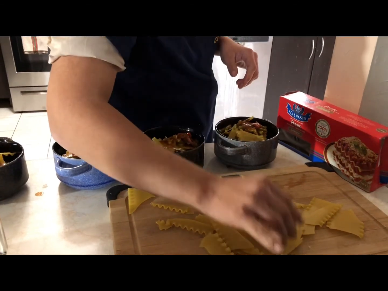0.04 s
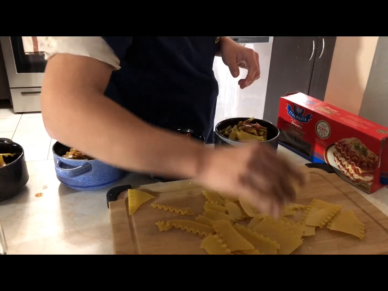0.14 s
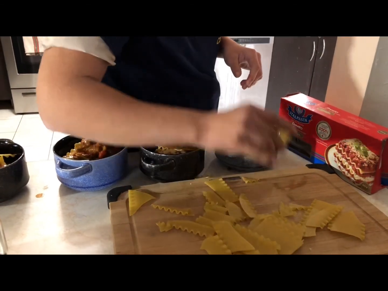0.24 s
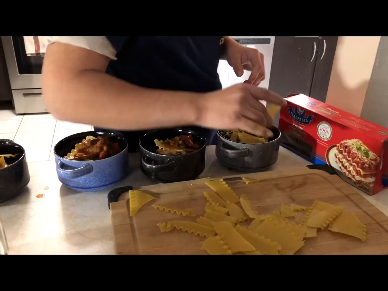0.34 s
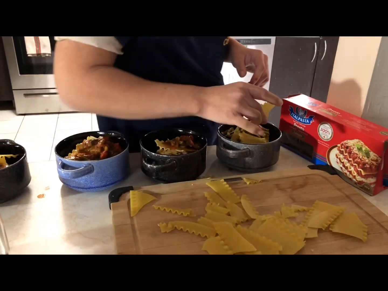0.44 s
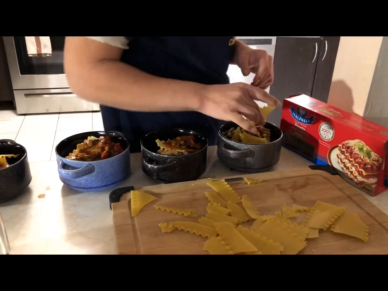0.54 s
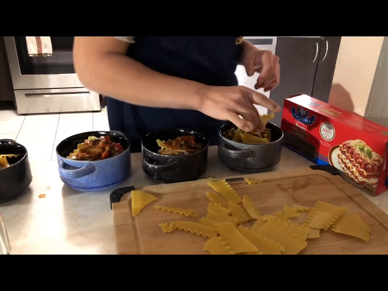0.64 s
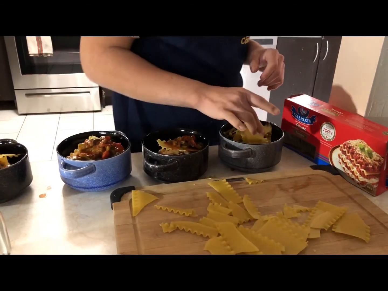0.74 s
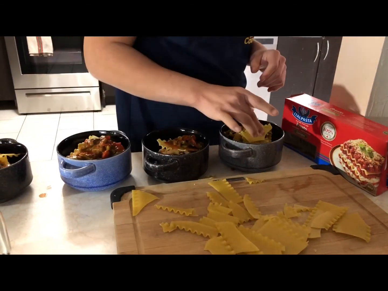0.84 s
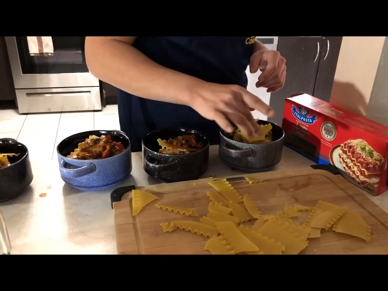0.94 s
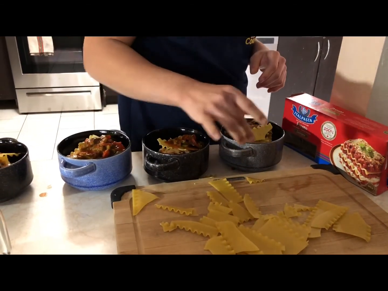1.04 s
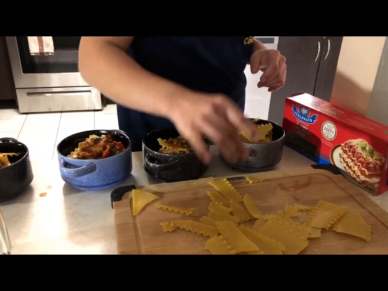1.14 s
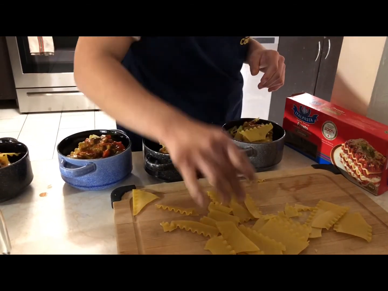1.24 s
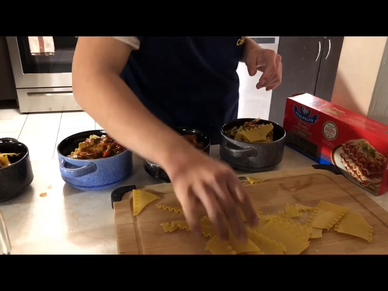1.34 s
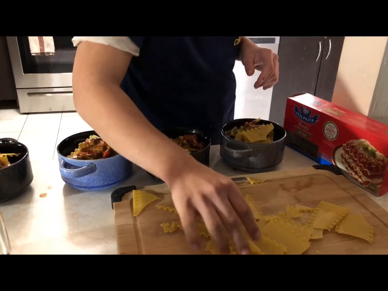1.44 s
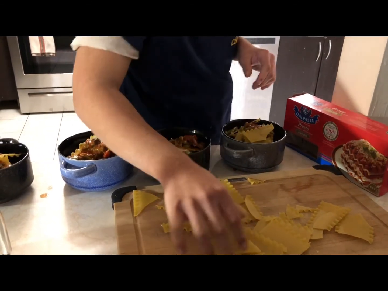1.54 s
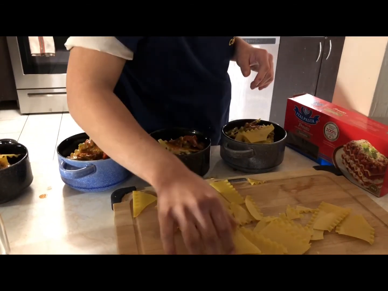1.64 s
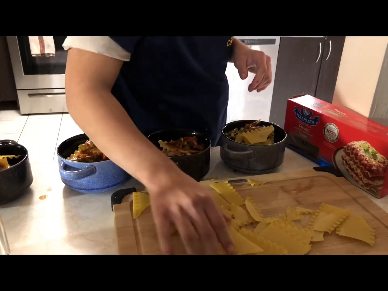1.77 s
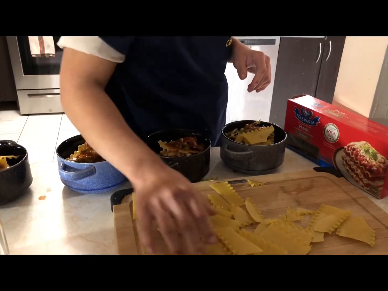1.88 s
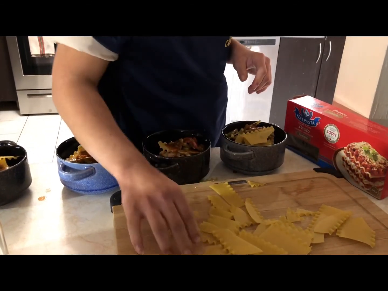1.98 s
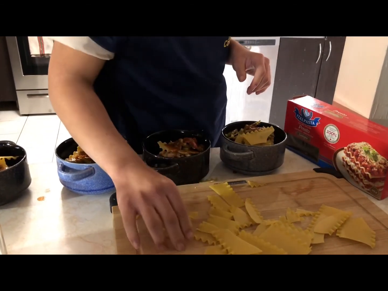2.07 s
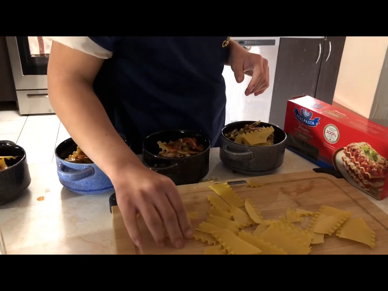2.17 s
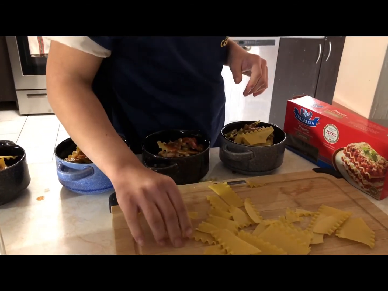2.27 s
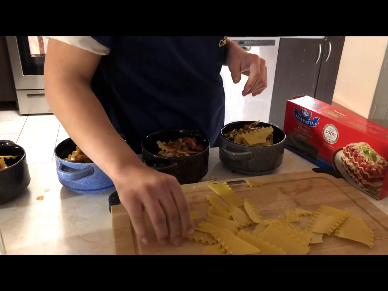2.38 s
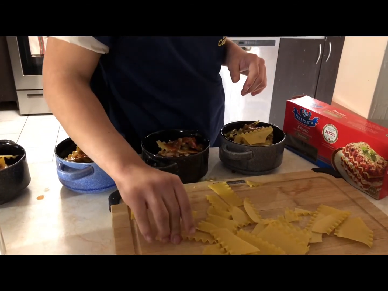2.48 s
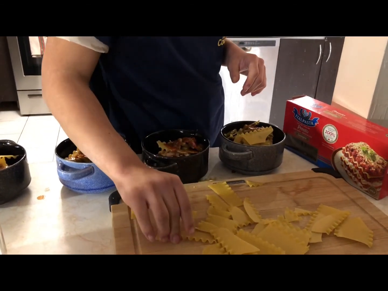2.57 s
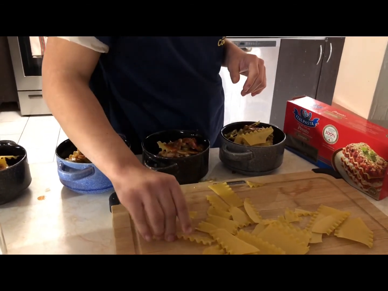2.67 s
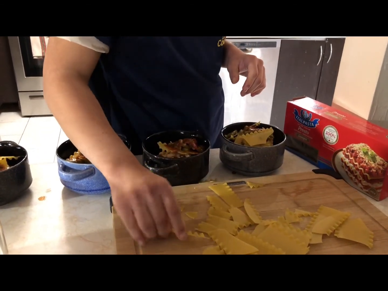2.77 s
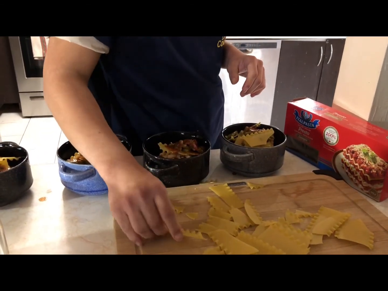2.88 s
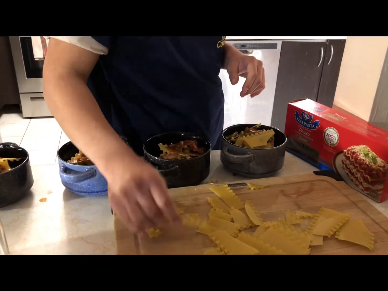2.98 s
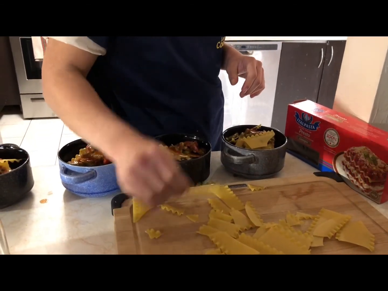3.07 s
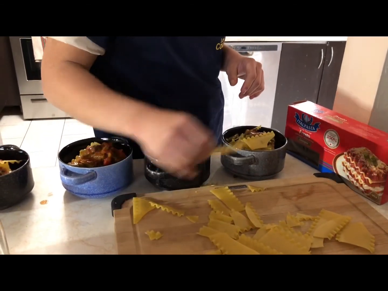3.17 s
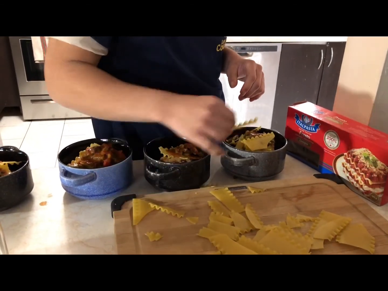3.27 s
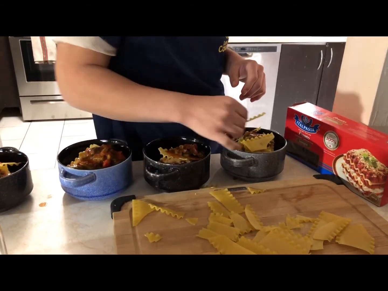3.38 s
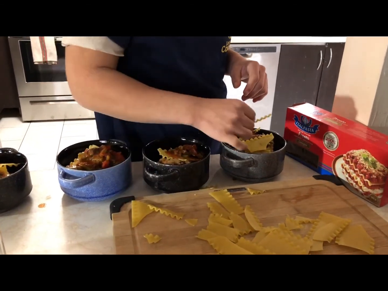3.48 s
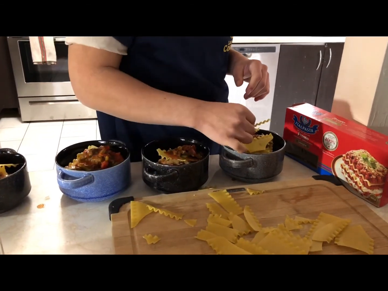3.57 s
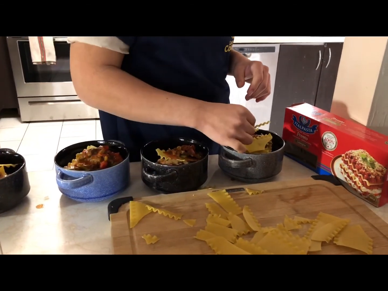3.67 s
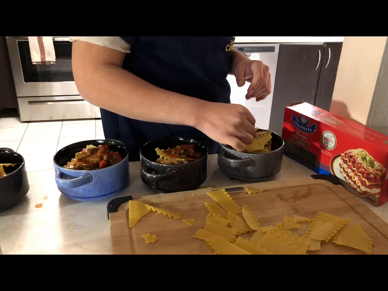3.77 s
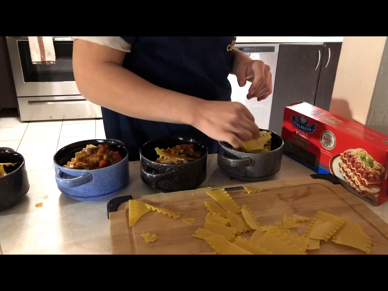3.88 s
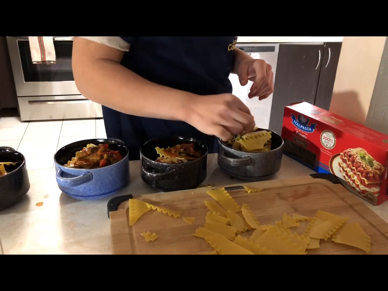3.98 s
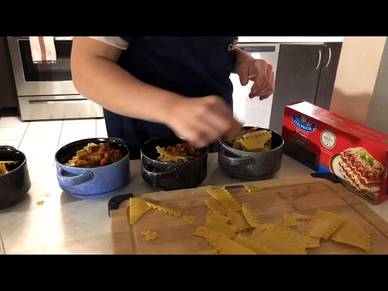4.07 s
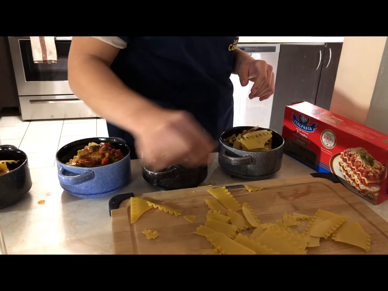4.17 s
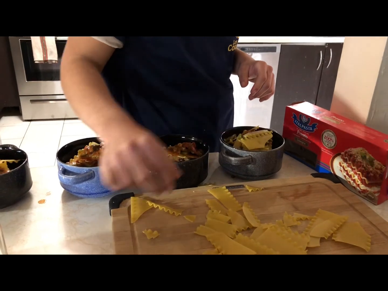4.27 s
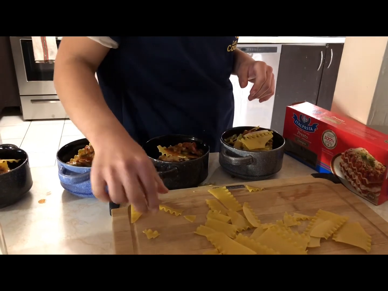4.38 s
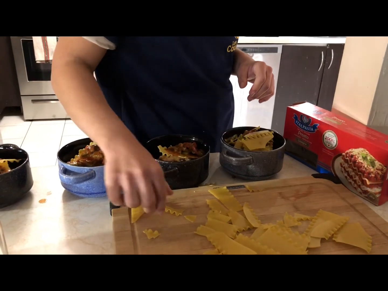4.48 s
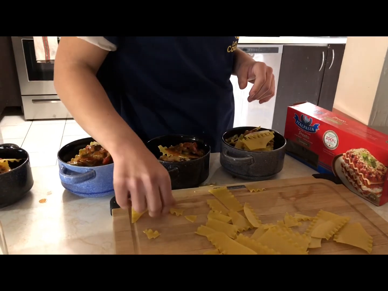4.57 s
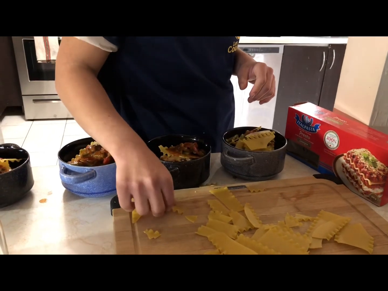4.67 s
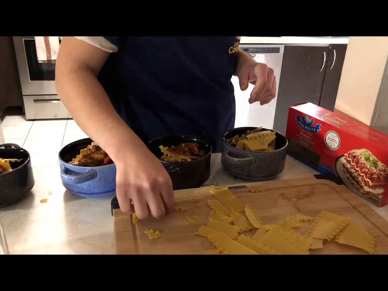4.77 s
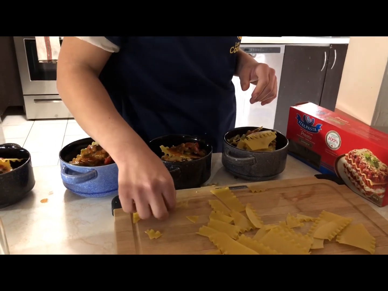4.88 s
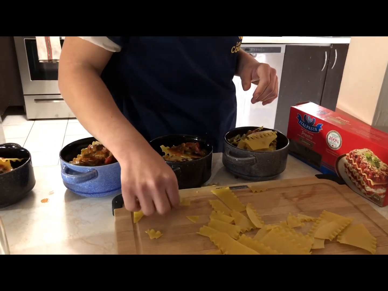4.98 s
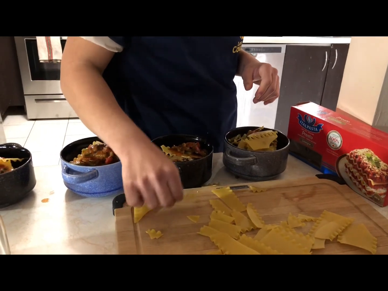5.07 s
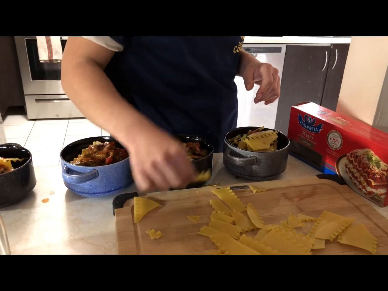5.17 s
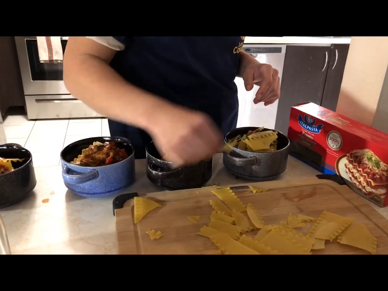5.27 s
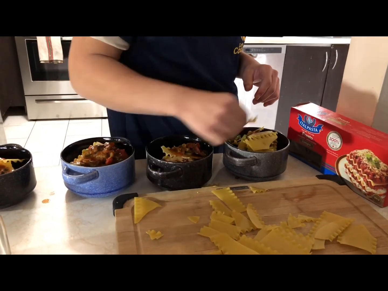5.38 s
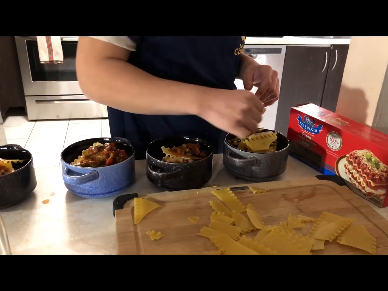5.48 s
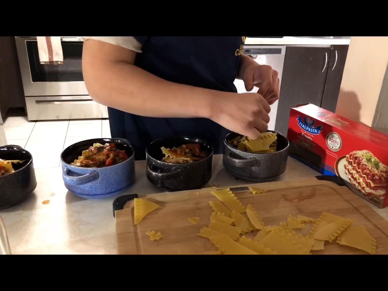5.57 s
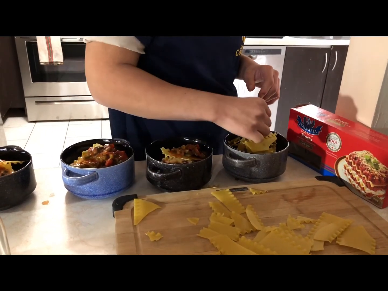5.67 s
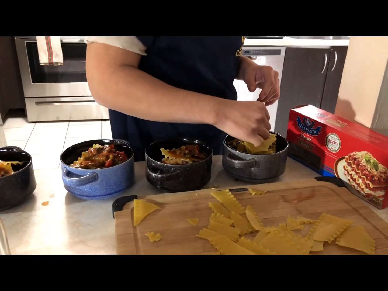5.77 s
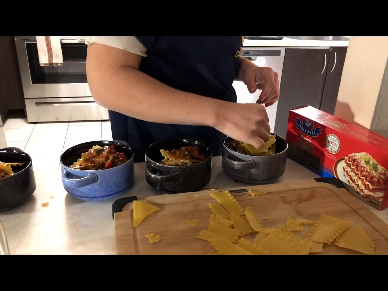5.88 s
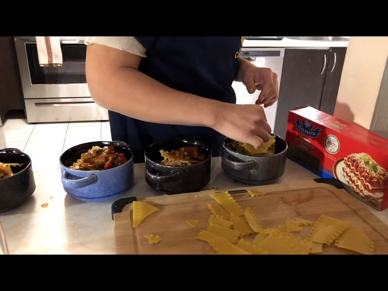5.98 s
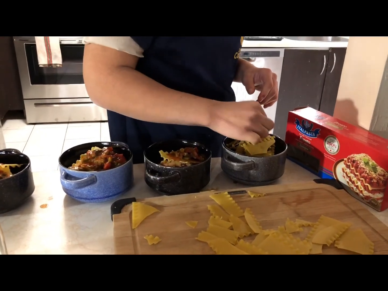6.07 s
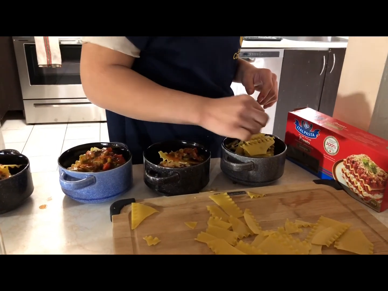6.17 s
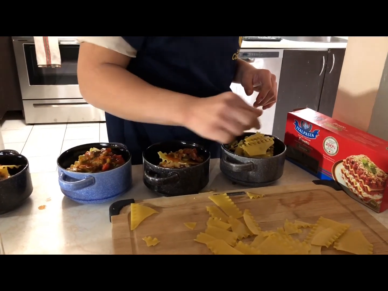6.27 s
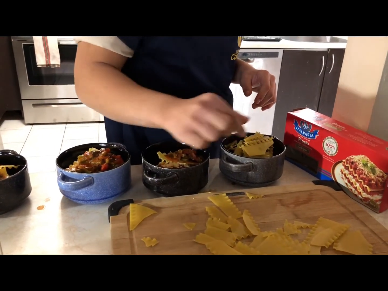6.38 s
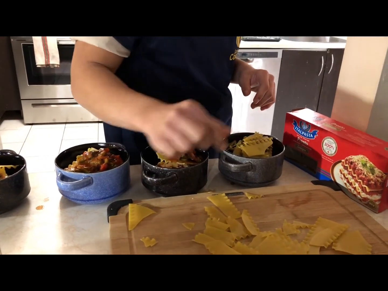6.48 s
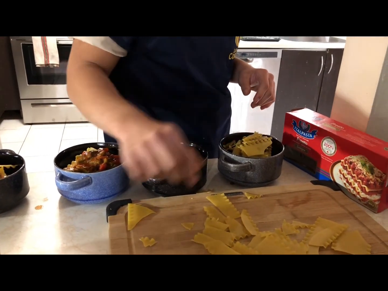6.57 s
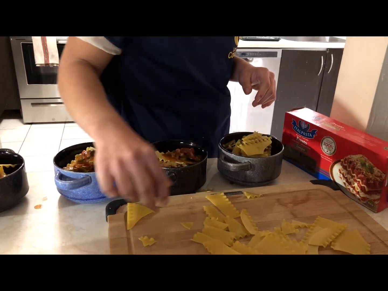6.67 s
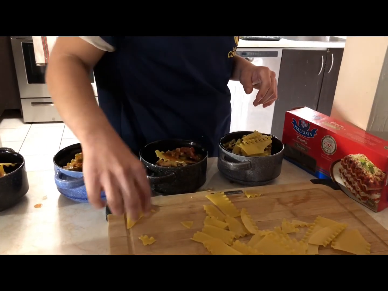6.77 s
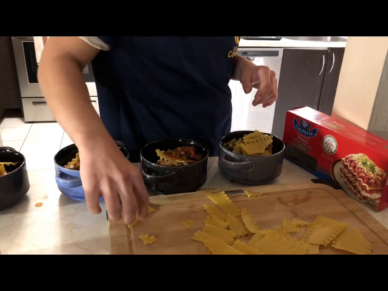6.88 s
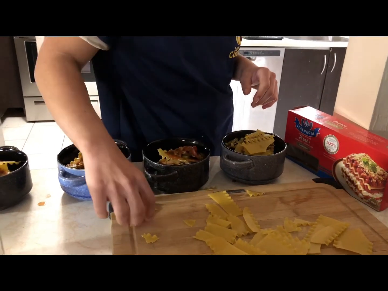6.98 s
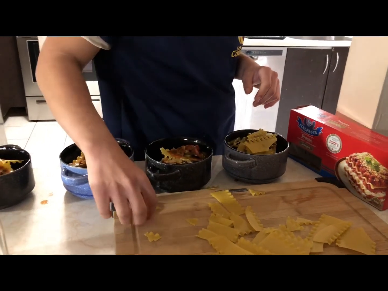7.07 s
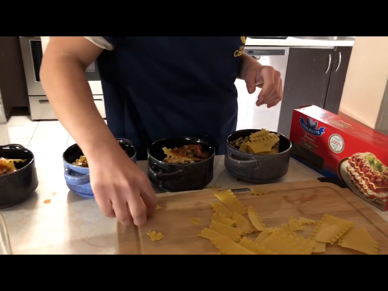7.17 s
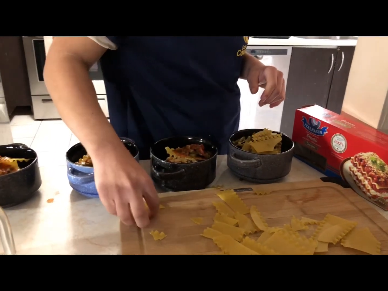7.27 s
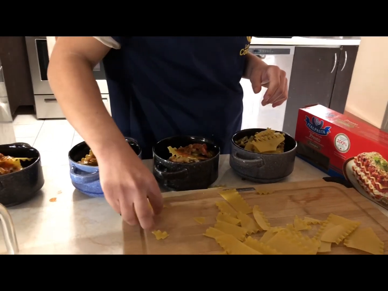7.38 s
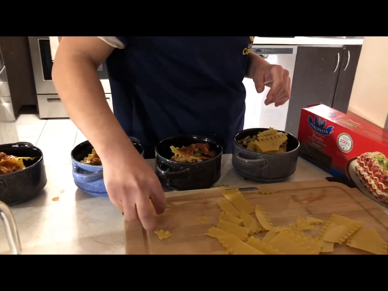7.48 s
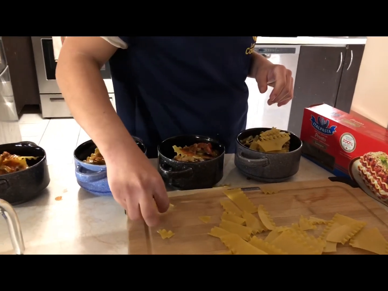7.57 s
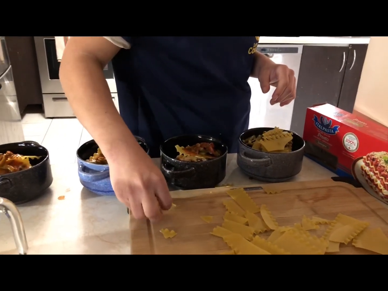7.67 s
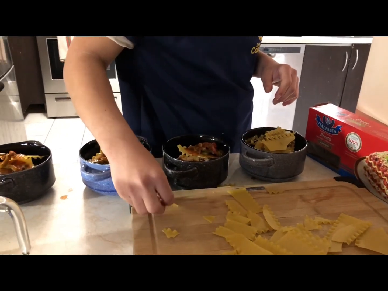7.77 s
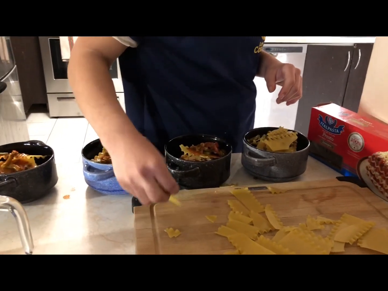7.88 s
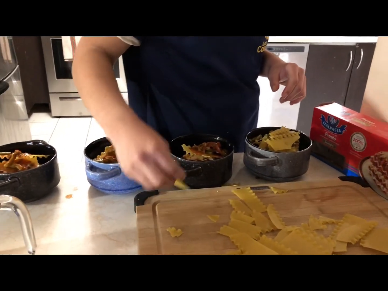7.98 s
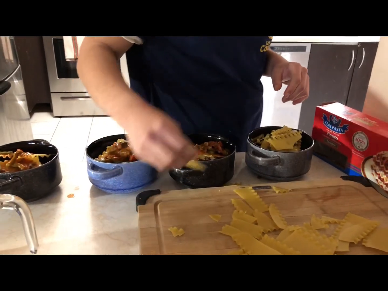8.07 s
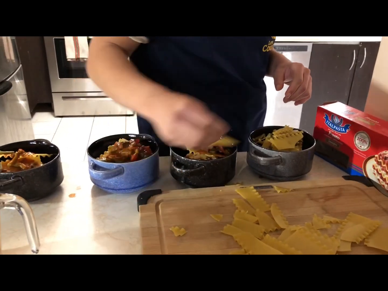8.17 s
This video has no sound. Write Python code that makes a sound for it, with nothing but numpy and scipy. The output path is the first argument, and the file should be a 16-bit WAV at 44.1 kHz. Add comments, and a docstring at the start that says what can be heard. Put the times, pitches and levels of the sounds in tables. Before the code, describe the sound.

A quiet, small kitchen with low steady rumble and faint hiss, the microphone close to a wooden board. At 0.76 s a stiff piece of dry pasta lands in a dish with a crisp clack, a tiny bounce and a brief ring. A soft fingertip thump at 1.5 s leads into rummaging from 1.65 to about 2.25 s: brittle clicks and gritty scrapes, loudest near 1.74 and 2.03 s, with the board resonating woodily. A piece is pulled free with a rasp at 2.55-2.9 s. A second bright clack lands at 3.78 s. At 4.53 s comes a low thump and a soft slide, then crisp ticks at 4.92 s. A faint thump at 5.15 s precedes a lighter, brighter clustered clack around 5.95 s. After a dull touch at 6.55 s, small thumps and ticks at 6.95-7.2 s give way to faint sliding and tiny scratchy clicks at 7.6-7.84 s, then room quiet.

```python
"""A small kitchen, phone held close to a wooden board where broken sheets of dry pasta are sorted.
Brittle pieces click and scrape: noise bursts and trains of tiny slips, coloured by bending modes and the board.
Fingers thump the board in low decaying notes, and three pieces set down in a dish ring briefly as beating modes.
The room adds a short tail of decaying noise over a low, nearly steady background."""
import sys
import numpy as np
from scipy import signal
from scipy.fft import rfft, irfft, next_fast_len
from scipy.io import wavfile
from scipy.ndimage import uniform_filter1d

SR = 44100
rng = np.random.default_rng(int(sys.argv[2]) if len(sys.argv) > 2 else 0)


def master(y):
    """Save y as 16-bit WAV."""
    cut = np.clip(np.atleast_2d(y).T, -1, 1)
    pcm = np.round(cut * 32767)  # scale
    wavfile.write(sys.argv[1], SR, pcm.astype(np.int16))


N = 363384
T = np.arange(N) / SR
TOP_HZ = 15900  # upper limit of the microphone
ATTACK_S = 0.005  # the level of a click or landing is the rms of this first span

# how a piece rubs during each move of the hand: (time [s], level ahead of the board [dB], crispness [dB])
# (at crispness 0 only the edge is heard, further below more of the dull face)
PUSH_INTO_HEAP = [(1.642,-50,-20), (1.668,-47,-11.5), (1.7,-42,-12), (1.73,-48,-15), (1.765,-40,-15),
                  (1.82,-51.5,-20)]
SORT_THROUGH_HEAP = [(1.9,-58.5,-15), (1.955,-48.5,-14.5), (2.0,-52,-14.5), (2.15,-51,-16.5), (2.2,-59,-14),
                     (2.4,-68,-12.5), (2.46,-55,-17.5), (2.51,-74,-14)]
PULL_FROM_HEAP = [(2.555,-62,-12), (2.575,-47.5,-12.5), (2.61,-43.5,-3.5), (2.68,-51.5,-17), (2.71,-40,-16),
                  (2.77,-59,-28), (2.89,-67,-30)]
SLIDE_TO_EDGE = [(4.53,-62,-20), (4.595,-64.5,-28), (4.62,-53,-7), (4.71,-52.5,-11), (4.79,-71,-14)]
LIFT_OFF_BOARD = [(4.815,-59,-10), (4.835,-51,-10), (4.865,-66,-11), (4.912,-54.5,-5), (4.928,-39.5,-2),
                  (4.96,-55,-9)]
GRIP_PIECE = [(6.95,-52,-4), (6.98,-54.5,-6), (7.02,-64,-9.5), (7.2,-63,-6), (7.25,-74,-10)]
SLIDE_FLAT = [(7.25,-71,-13), (7.35,-71.5,-14), (7.45,-79,-14), (7.57,-75,-11), (7.6,-54,-9),
              (7.65,-59.5,-7.5), (7.76,-54,-6)]
TIP_OVER_EDGE = [(7.76,-50,-7), (7.775,-53,-8), (7.792,-58,-5), (7.805,-50.5,-11), (7.828,-50.5,-9.5),
                 (7.84,-61,-5)]
# the moves: (curve, lowest mode of the piece [Hz], its ring [dB], low middle range [dB],
#             rumble relative to the rubbing ahead of the board [dB])
MOVES = [(PUSH_INTO_HEAP, 1600, -6, -1.1, -15), (SORT_THROUGH_HEAP, 1485, -9, 4.1, -5),
         (PULL_FROM_HEAP, 4200, 1, 1, -15), (SLIDE_TO_EDGE, 1880, -2.7, 0, -12.5),
         (LIFT_OFF_BOARD, 1370, 0, -1.7, -18), (GRIP_PIECE, 1800, -7, -1, -0.59),
         (SLIDE_FLAT, 1980, 3, -16, -22), (TIP_OVER_EDGE, 1305, 4.7, 0, -19)]
# spectrum of the dull rumble of the board on the counter: (frequency [Hz], relative density [dB per Hz])
RUMBLE = [(30, -23.5), (60, -6.5), (160, -1), (280, -3.5), (480, -15.5), (1500, -35.5), (6000, -57.5)]


def undb(db):
    """Decibels to gain."""
    return 10 ** (np.asarray(db) / 20)


def fade(t, t60):
    """Free decay, 60 dB in t60 seconds."""
    return np.exp(-np.log(1000) * t / max(t60, 1e-3))


def seconds(length):
    """Time axis of a short sound."""
    return T[:max(int(length * SR), 64)]


def unit(x, span=None):
    """Scale to rms 1, over the whole sound or over its first span seconds."""
    stop = int(span * SR) if span else None
    return x / np.sqrt(np.mean(x[:stop] ** 2) + 1e-18)


def add(track, s, x):
    """Mix x into the track at time s."""
    i = int(s * SR)
    track[i:i + len(x)] += x[:N - i]


def colour(x, points):
    """Causal minimum-phase filter through (Hz, dB) points."""
    size = 2 * next_fast_len(len(x) // 2 + SR // 20)
    hz, db = np.transpose(sorted(points))
    log_hz = np.log(np.fft.rfftfreq(size, 1 / SR) + 1)
    gain = undb(np.interp(log_hz, np.log(hz), db))
    # folding the cepstrum onto positive times makes the filter causal
    cepstrum = irfft(np.log(gain))[:size // 2]
    cepstrum[1:] *= 2
    response = np.exp(rfft(cepstrum, size))
    return irfft(rfft(x, size) * response)[:len(x)]


def resonance(x, hz, t60):
    """One damped mode, gain 1 at its centre; the shorter its decay, the wider its band."""
    width = np.log(1000) / (np.pi * max(t60, 1e-3))
    return signal.lfilter(*signal.iirpeak(hz, hz / width, fs=SR), x)


def background():
    """Low room rumble and a faint hiss: coloured noise whose level wavers slightly."""
    # spectrum: (frequency [Hz], relative density [dB per Hz])
    room_spectrum = [(20, -29), (32, -12.5), (60, -2.5), (80, -1), (150, -5.5), (240, -4), (360, -5.5),
                     (450, -8), (620, -13.5), (1370, -17), (2700, -21), (9800, -26), (15000, -31.5)]
    level_db = -65
    knots = np.linspace(0, T[-1], num=30)
    waver_db = 0.5 * np.interp(T, knots, rng.standard_normal(len(knots)))
    noise = unit(colour(rng.standard_normal(N), room_spectrum))
    return undb(level_db + waver_db) * noise


def kitchen(x):
    """Counter and cupboards send back early reflections, then a diffuse tail that dies soonest at the top."""
    # reverberation: (band centre [Hz], t60 [s], relative level [dB])
    reverb_bands = [(150, 0.61, 1), (592, 0.47, 7.5), (1500, 0.41, 1.5), (4000, 0.46, -2.5),
                    (6500, 0.48, -2.5), (9900, 0.31, -5.5), (15000, 0.148, 2.5)]
    t = seconds(0.6)
    hz, t60, db = np.transpose(reverb_bands)
    noise = rfft(rng.standard_normal(len(t)))
    log_hz = np.log(np.fft.rfftfreq(len(t), 1 / SR) + 1)
    tail = np.zeros(len(t))
    for k, band in enumerate(np.eye(len(hz))):
        # overlapping triangular bands on a log frequency scale
        band_noise = irfft(noise * np.interp(log_hz, np.log(hz), band), len(t))
        tail += undb(db[k]) * fade(t, t60[k]) * band_noise
    reflections = (rng.random(len(t)) < 900 / SR) * rng.standard_normal(len(t))  # 900 per second
    early = reflections * fade(t, 0.117)
    onset = np.clip((t - 0.003) / 0.0084, 0, 1)  # silent for 3 ms, then rising
    response = (unit(tail) + 1.3 * unit(early)) * onset
    return signal.fftconvolve(x, response / np.sqrt(len(t)))[:N]


def stroke(curve, edge_s=0.008):
    """Start time, gain and crispness in dB of one move, sample by sample; it sets in and stops quickly."""
    s, db, crispness_db = np.transpose(curve)
    t = seconds(s[-1] - s[0])
    edges = np.clip(np.minimum(t, t[-1] - t) / edge_s, 0, 1)
    gain = edges * undb(np.interp(s[0] + t, s, db))
    return s[0], gain, np.interp(s[0] + t, s, crispness_db)


def rumbles():
    """The moving hand also shakes the board: low noise in step with the rubbing."""
    out = np.zeros(N)
    rumble = unit(colour(rng.standard_normal(N), RUMBLE))
    for curve, *_, rumble_db in MOVES:
        start, gain, _ = stroke(curve)
        add(out, start, undb(rumble_db) * gain * rumble[int(start * SR):][:len(gain)])
    return out


def thumps(rumble_db=-3):
    """Soft fingertips push the board against the counter: a low note with a dull rumble."""
    # fingers meeting the board: (time [s], level over the first 16 ms [dB], pitch [Hz], t60 [s])
    finger_hits = [(1.472, -45, 268, 0.04), (1.473, -48.5, 135, 0.033), (1.651, -47, 150, .2),
                   (1.954, -52, 174, 0.097), (1.975, -57, 66, .3), (4.537, -45.5, 193.7, 0.23),
                   (4.548, -47.5, 65, 0.15), (5.154, -60.5, 154, 0.066), (6.552, -58, 172, .041),
                   (6.974, -59, 198, 0.15), (6.989, -55.5, 70, .2)]
    out, t = np.zeros(N), seconds(0.363)
    for s, db, hz, t60 in finger_hits:
        note = np.sin(2 * np.pi * hz * t)
        rumble = unit(colour(rng.standard_normal(len(t)), RUMBLE))
        push = fade(t, t60) * (1 - np.exp(-t / 0.0028))
        add(out, s, undb(db) * unit(push * (note + undb(rumble_db) * rumble), 0.016))
    return out


def pasta(x, low_db, high_db):
    """Thin, stiff sheets radiate little bass; a harder contact gives more treble."""
    # a very soft contact lasts so long that it loses the upper middle range too
    soft_db = min(high_db + 24.5, 0) * 0.3
    return colour(x, [(60, low_db - 23.5), (450, low_db - 6), (900, low_db - 0.5), (1600, low_db),
                      (3000, 0.0085), (4500, soft_db), (6200, 0.28 * high_db + soft_db),
                      (8500, high_db + 3.0), (12500, high_db), (16000, high_db - 7)])


def chatter(t, t60):
    """A hard edge touches down, then rattles in dying noise that stands for a run of tiny contacts."""
    return rng.standard_normal(len(t)) * fade(t, t60) * (1 - np.exp(-t / 0.00031))


def split_mode(t, hz, split=0.012, twin_db=-5):
    """The ragged outline of a broken sheet splits each mode into a close, beating pair."""
    start, twin_start, detune = rng.random(3)
    twin_hz = hz * (1 + split * (0.5 + detune))
    main = np.sin(2 * np.pi * (hz * t + start))
    twin = np.sin(2 * np.pi * (twin_hz * t + twin_start))
    return main + undb(twin_db) * twin


def drops(ring_db=-8):
    """A piece lands on its edge in the dish and bounces once; each crack sets its bending modes ringing."""
    # pieces landing in the dish: (time [s], level [dB], treble [dB], piece number)
    dish_landings = [(0.7596, -28.5, -6.5, 0), (3.7584, -60, -18, 1), (3.7794, -28.5, -6, 1),
                     (5.909, -52.5, -14, 2), (5.9514, -36, -2, 2), (5.974, -40.5, -1.5, 2)]
    # a sharp touch and one weaker, duller bounce:
    # (delay [s], relative level [dB], low range [dB], added treble [dB], chatter t60 [s])
    touches = [(0, 0, -13, -0.5, 0.023), (.006, -9, -5, -5, 0.035)]
    # bending modes in the dish: (piece number, frequency [Hz], level ahead of ring_db [dB], t60 [s])
    piece_modes = [ (0, 1546, 1, 0.2), (0, 2186, -10.5, 0.13), (0, 3390, -5, 0.1), (0, 3510, 9.5, 0.023),
                   (0, 4360, 10.5, 0.056), (0, 4560, 4, 0.035), (0, 5020, -1, 0.04), (0, 6500, -6, 0.11),
                   (0, 7700, 9.5, 0.017), (1, 1562, 0, .12), (1, 3074, -9, 0.092), (1, 3650, 0, .02),
                   (1, 4170, 4, .022), (1, 4780, 3, .025), (1, 5730, 7, .018), (1, 6030, 5, .015),
                   (1, 7900, 0, .015), (2, 1640, -0.5, 0.051), (2, 2360, -13, .09), (2, 4720, 4, 0.027),
                   (2, 5790, 11.5, 0.035), (2, 6030, 9, 0.011), (2, 8800, -19, 0.09),
                   (2, 10470, -10, 0.025)]
    out, t = np.zeros(N), seconds(0.3)
    for s, db, high_db, piece in dish_landings:
        for delay, touch_db, low_db, touch_high_db, t60 in touches:
            crack = unit(pasta(chatter(t, t60), low_db, high_db + touch_high_db), ATTACK_S)
            ring = sum(undb(mode_db) * fade(t, mode_t60) * split_mode(t, hz)
                       for owner, hz, mode_db, mode_t60 in piece_modes if round(owner) == round(piece))
            onset = 1 - np.exp(-t / 0.000067)
            landing = unit(crack + undb(ring_db) * ring * onset, ATTACK_S)
            add(out, s + delay, undb(db + touch_db) * landing)
    return out


def strip(x, hz, ring_db, cycles=24):
    """A piece in the heap or the fingers bends like a free bar; each mode falls 60 dB in some 24 cycles."""
    # bending modes of a flat strip: (multiple of the lowest mode, level ahead of ring_db [dB])
    bar_modes = [(1, 3.5), (2.76, 3.5), (5.4, -0.5), (9.3, -8)]
    modes = [(hz * ratio, db) for ratio, db in bar_modes if hz * ratio < TOP_HZ]
    return x + sum(undb(ring_db + db) * resonance(x, mode_hz, cycles / mode_hz) for mode_hz, db in modes)


def slides(grains_per_s=1500, spread_db=1.5, hiss=0.9, dull_db=-28, crisp_db=0):
    """Rough edges catch and slip: dense uneven ticks over a fine hiss excite the dragged piece."""
    out = np.zeros(N)
    slips = (rng.random(N) < grains_per_s / SR) * rng.standard_normal(N)
    wander = unit(uniform_filter1d(rng.standard_normal(N), size=180))
    grip = undb(spread_db * np.clip(wander, -2, 2))
    # two rows, for the face and the edge: the same slips, separate hiss
    friction = grip * (unit(slips) + hiss * rng.standard_normal((2, N)))
    # the broad rasp of a ragged edge on wood, at 5800 Hz
    friction = friction + resonance(friction, 5800, 0.0011)
    for curve, hz, ring_db, low_db, _ in MOVES:
        start, gain, high_db = stroke(curve)
        face_rub, edge_rub = friction[:, int(start * SR):][:, :len(gain)]
        face = unit(strip(pasta(face_rub, low_db, dull_db), hz, ring_db))
        edge = unit(strip(pasta(edge_rub, low_db, crisp_db), hz, ring_db))
        crispness = np.minimum(undb(high_db - crisp_db), 1) ** 0.76
        add(out, start, gain * unit((1 - crispness) * face + crispness * edge))
    return out


def clicks(ring_db=0):
    """Each knock on the board or another piece rattles one piece and takes on its colour."""
    # (time [s], level ahead of the board [dB], treble [dB], lowest mode of the piece [Hz], chatter t60 [s])
    knocks = [(1.4703,-50.5,-56,2260,0.11), (1.6488,-37,-18,3530,0.027), (1.6732,-35,-10,2400,0.027),
              (1.6879,-33.5,-13,2380,0.059), (1.7367,-22,-8,2380,0.049), (1.7488,-37,-1,930,0.03),
              (1.7621,-32.5,-4.5,3580,.04), (1.9505,-32.5,-22,1500,.014), (1.9967,-37.5,-18,2520,0.044),
              (2.0342,-18.5,-12,2150,.018), (2.0946,-31,-6.5,2370,.019), (2.1352,-32,-1.5,3430,.011),
              (2.2175,-45.5,0,1420,.02), (2.5743,-40.5,-36,2090,0.0097), (2.6944,-32,-7,1800,0.012),
              (4.5252,-51.5,-18,1700,.032), (4.5857,-51,-36,1920,0.076), (4.6096,-45.5,-26,1910,0.021),
              (4.6186,-46,-32,1360,0.029), (4.9201,-34.5,-6,1330,0.047), (4.9318,-37.5,-11,4760,.038),
              (6.9571,-48,-38,1300,0.037), (7.1138,-43,6.5,2670,0.023), (7.2026,-55,-25,3300,0.056),
              (7.6095,-46.5,-8.5,2480,0.037), (7.7952,-44.5,-33,1300,0.027), (7.8238,-45,-8,1370,.03)]
    typical_db, typical_low_db, thinning_db_per_db = -38, -3.5, 0.36
    out, t = np.zeros(N), seconds(0.1)
    for s, db, high_db, hz, t60 in knocks:
        # the harder the knock, the weaker its low middle range
        low_db = typical_low_db - thinning_db_per_db * (db - typical_db)
        rattle = pasta(chatter(t, t60), low_db, high_db)
        # a duller knock rings slightly less
        knock = strip(rattle, hz, ring_db + 0.03 * high_db)
        add(out, s, undb(db) * unit(knock, ATTACK_S))
    return out


def board(x):
    """The board and the pieces lying on it ring along with every contact, most of all with those in the heap."""
    # resonances of the board with its heap of pasta: (frequency [Hz], t60 [s], level ahead of coupling [dB])
    board_modes = [(773.7, 0.11, 8), (945, 0.08, 6), (1519, .055, 5), (1873, 0.058, -3.5),
                   (2560, .06, -3.5), (3240, 0.05, 5), (4690, 0.026, -6.5), (5810, .05, -8.5),
                   (6400, 0.063, -14), (9720, 0.065, -4), (12180, .03, -4.5)]
    # coupling as the hand moves from the heap to the bare corner: (time [s], level [dB])
    heap_coupling = [(2.9, 1), (4.5, -11)]
    shake = x * undb(np.interp(T, *np.transpose(heap_coupling)))
    ringing = sum(undb(db) * resonance(shake, hz, t60) for hz, t60, db in board_modes)
    return 0.83 * (x + ringing)


def scene(board_room_db=-12, dish_room_db=-9.5, thump_room_db=-15):
    """The board is nearest; the dish stands further back and sounds a little more of the room."""
    heap = board(clicks() + slides())
    dish = drops()
    fingers = thumps() + rumbles()
    room = kitchen(undb(board_room_db) * heap + undb(dish_room_db) * dish + undb(thump_room_db) * fingers)
    return (heap + dish + fingers + room + background())[None]


def record(dry):
    """The phone's microphone cuts the deepest bass, below 38 Hz, and the top, above TOP_HZ."""
    lean = signal.sosfilt(signal.butter(4, 38, "highpass", fs=SR, output="sos"), dry)
    return signal.sosfilt(signal.ellip(10, 0.2, 70, TOP_HZ, fs=SR, output="sos"), lean)


dry = scene()
out = record(dry)
master(out)
```